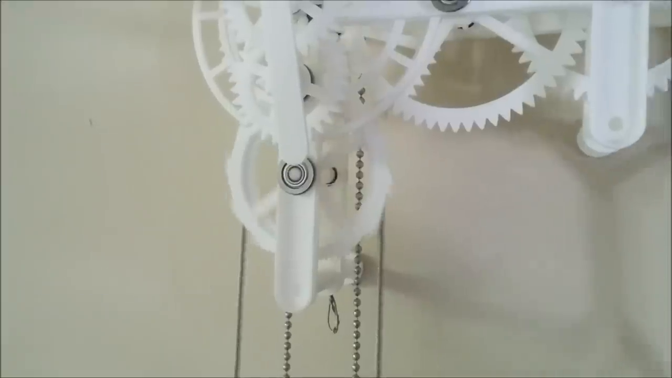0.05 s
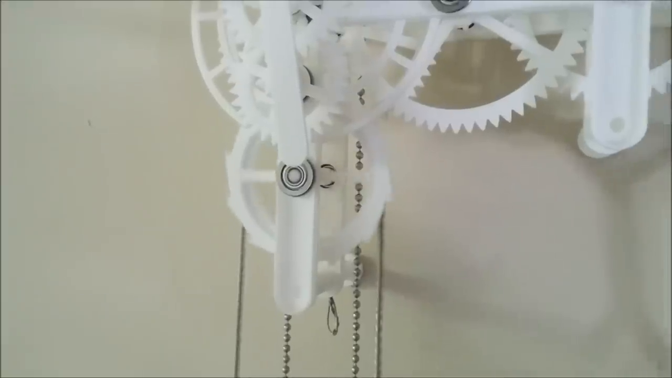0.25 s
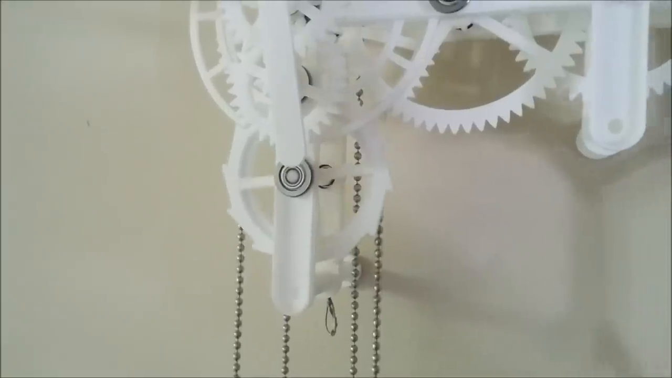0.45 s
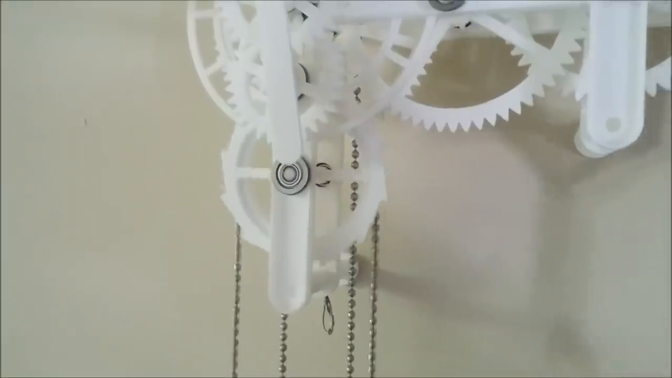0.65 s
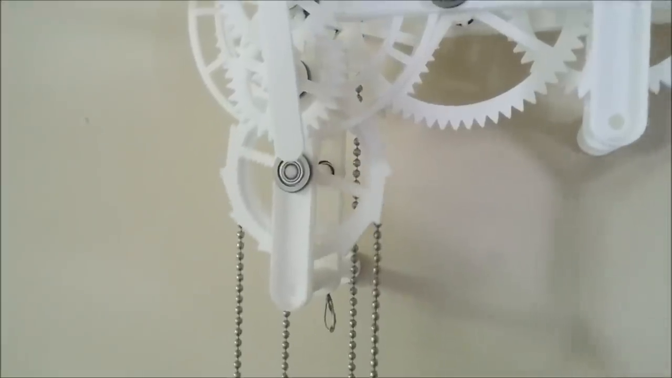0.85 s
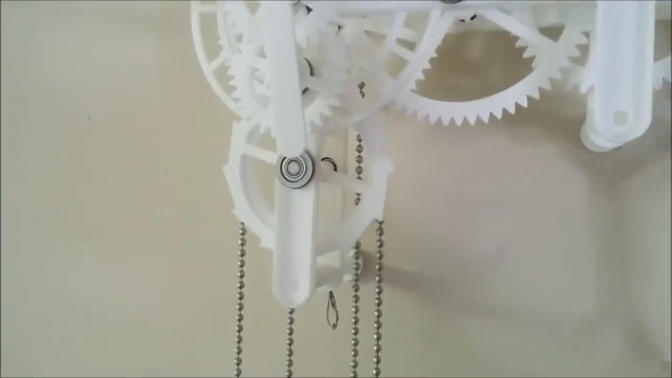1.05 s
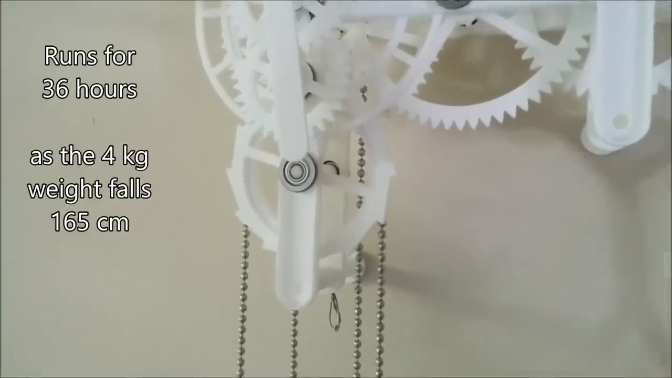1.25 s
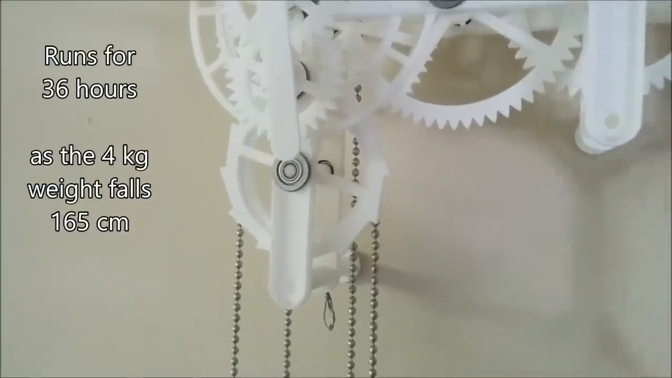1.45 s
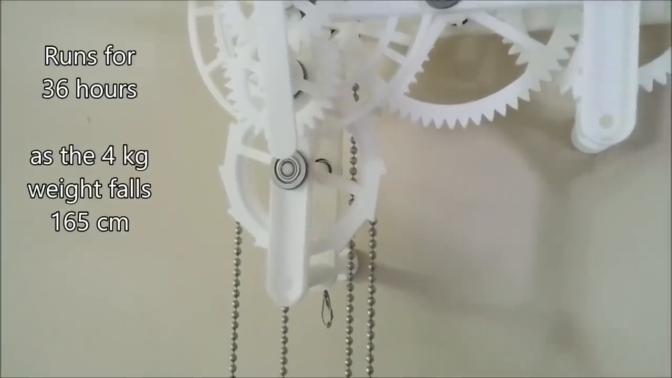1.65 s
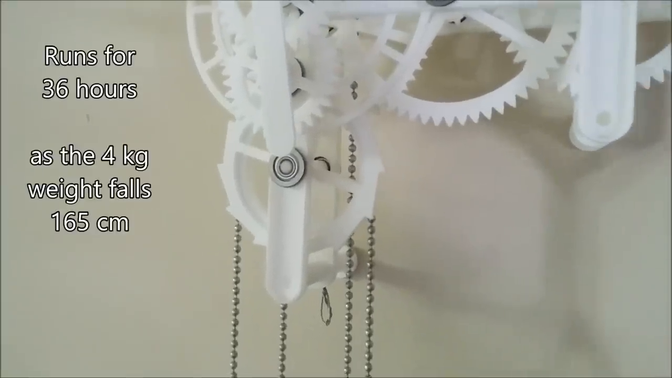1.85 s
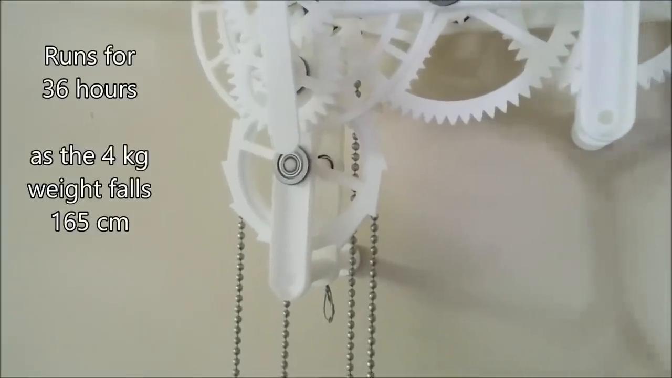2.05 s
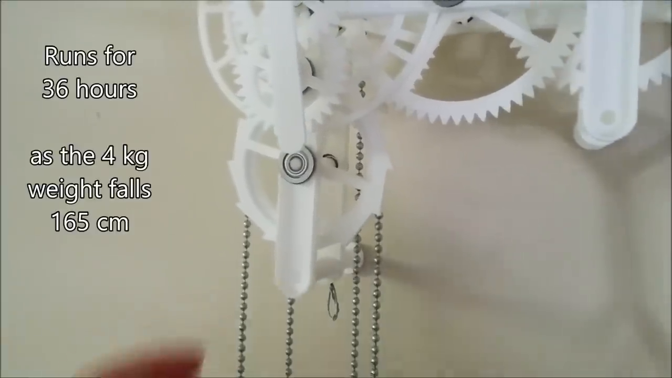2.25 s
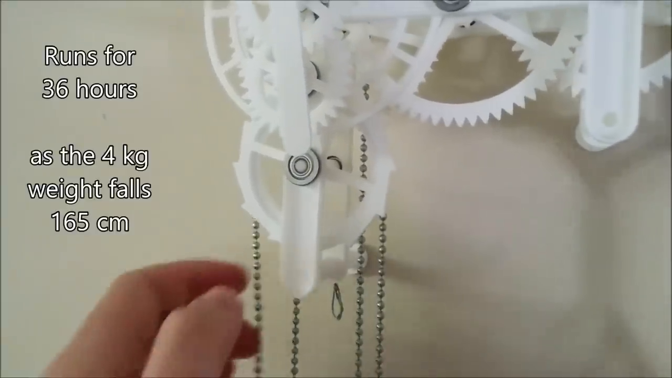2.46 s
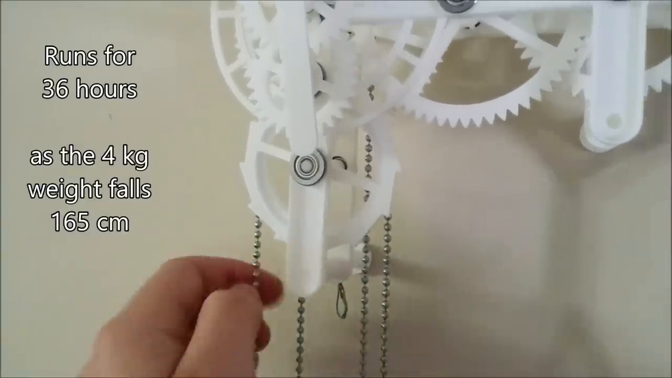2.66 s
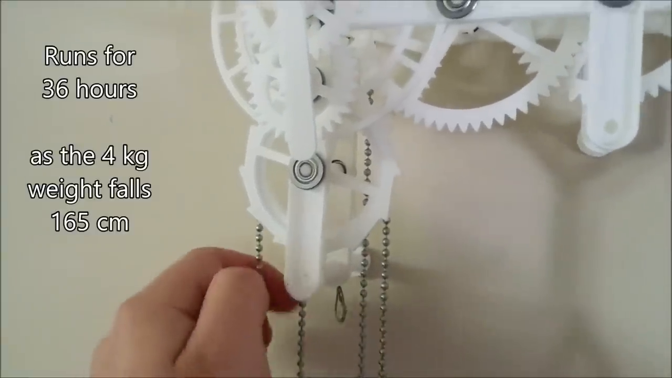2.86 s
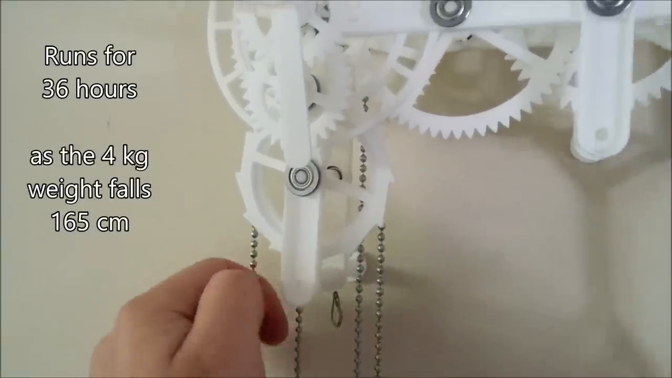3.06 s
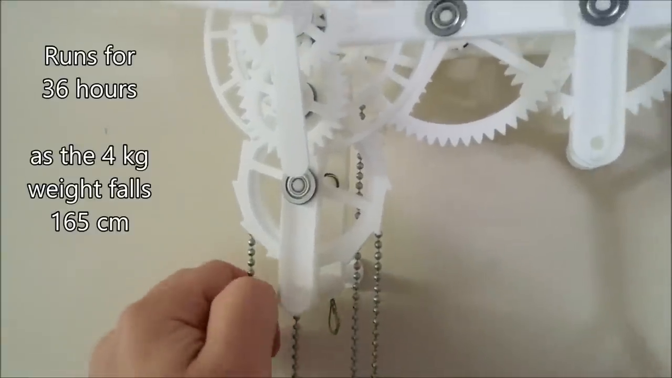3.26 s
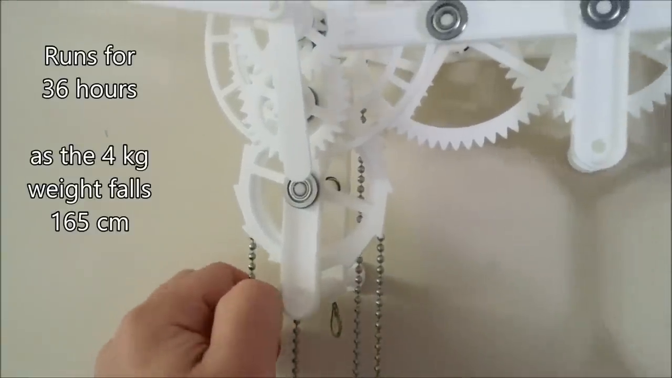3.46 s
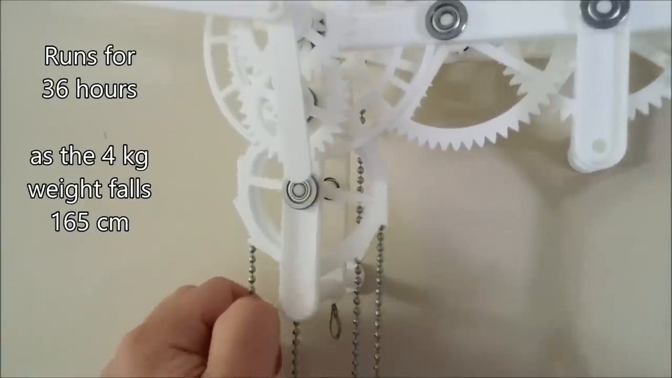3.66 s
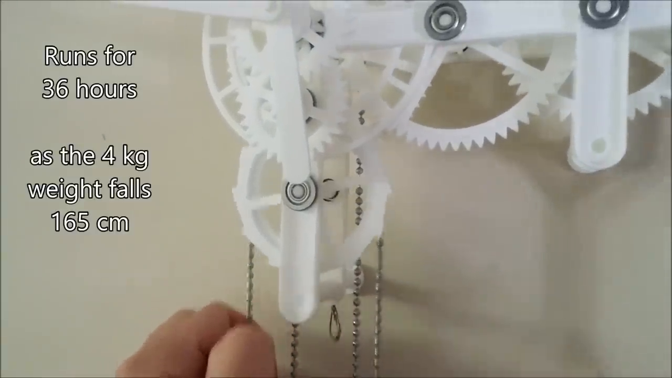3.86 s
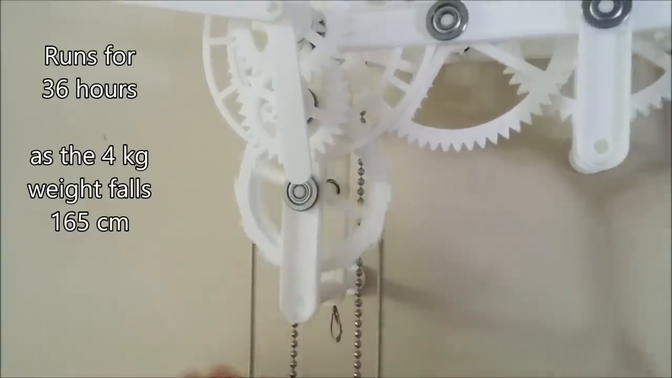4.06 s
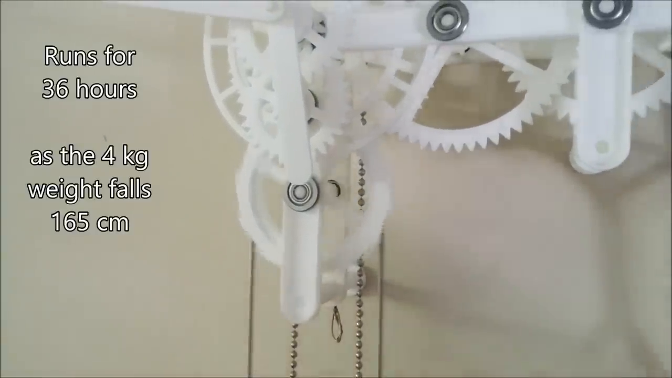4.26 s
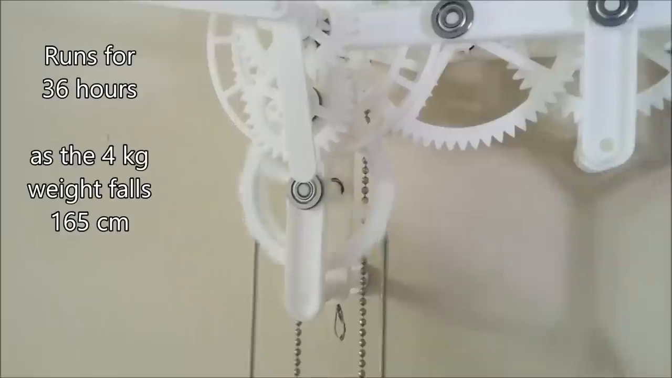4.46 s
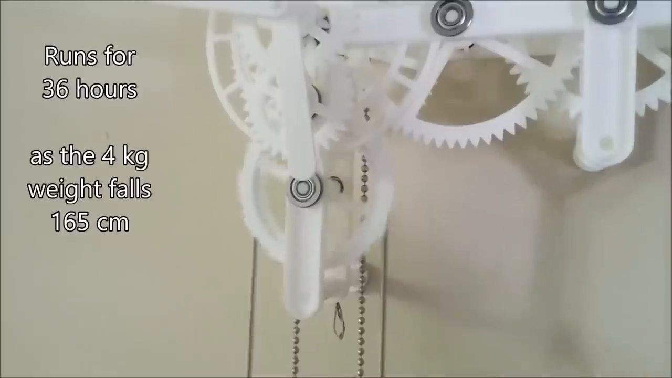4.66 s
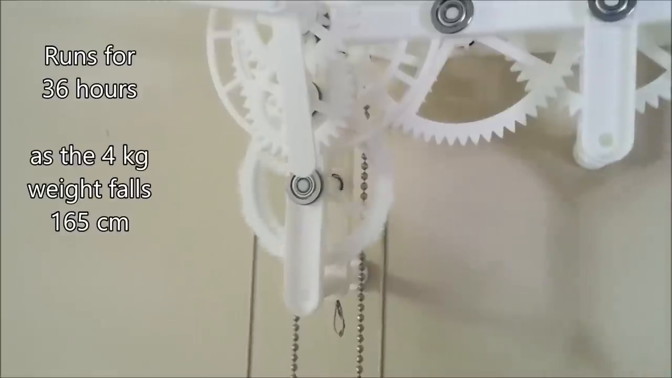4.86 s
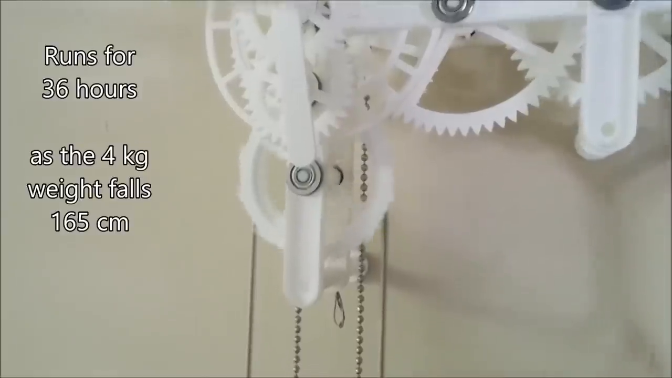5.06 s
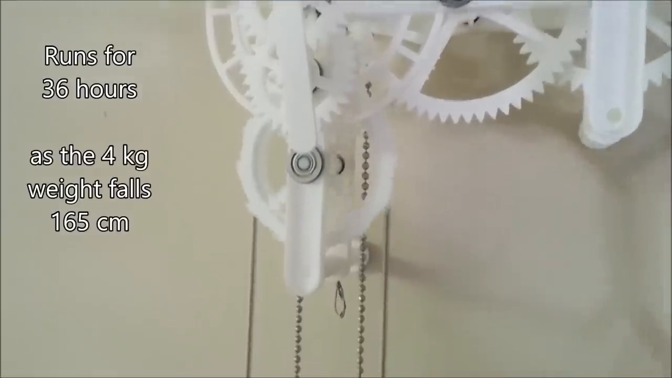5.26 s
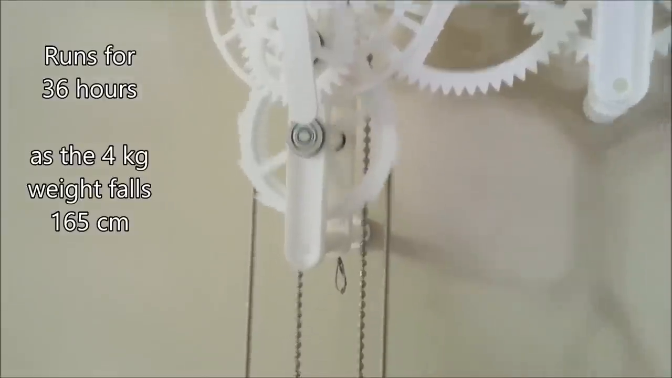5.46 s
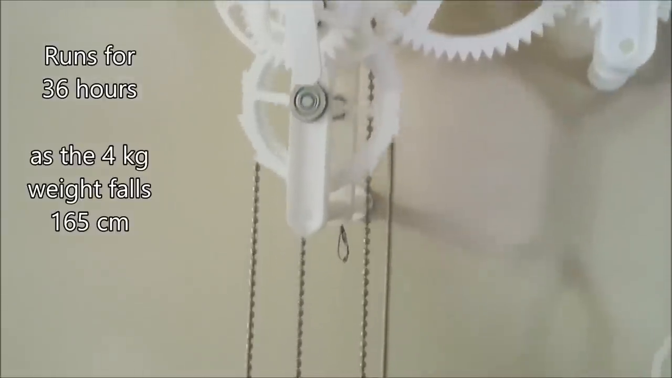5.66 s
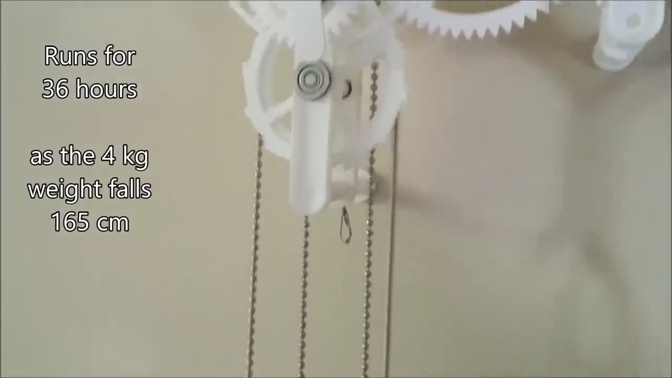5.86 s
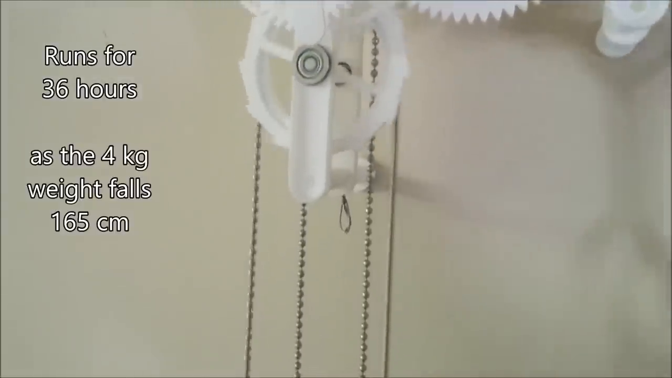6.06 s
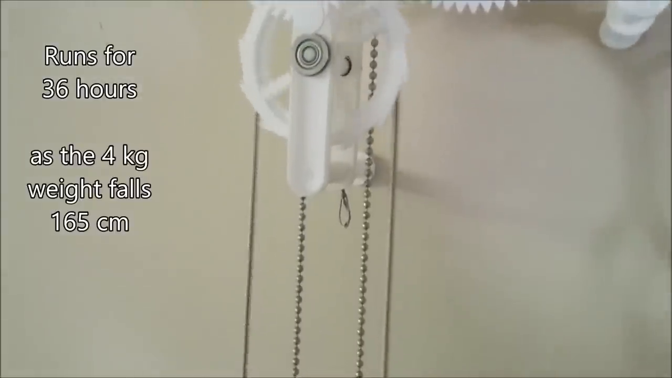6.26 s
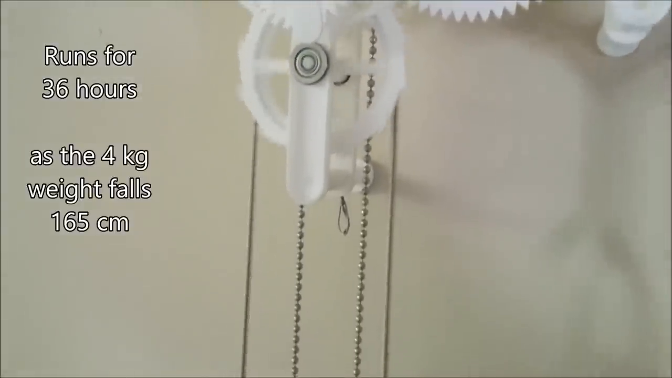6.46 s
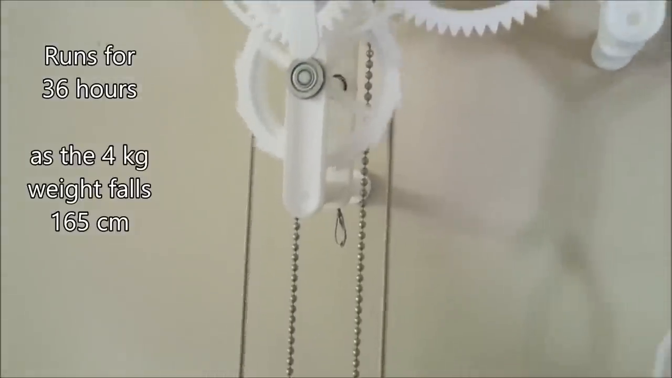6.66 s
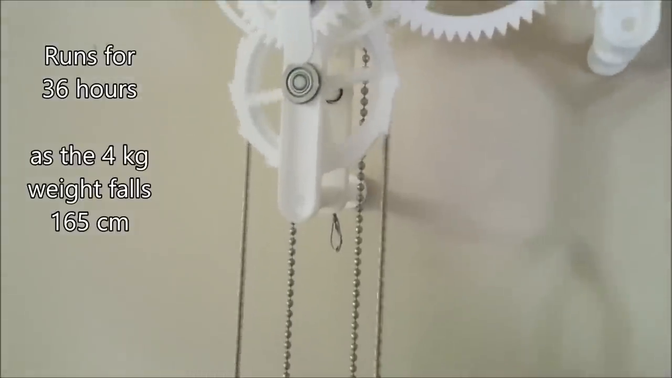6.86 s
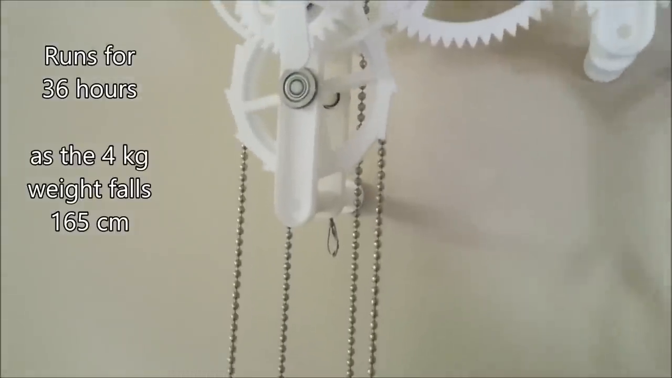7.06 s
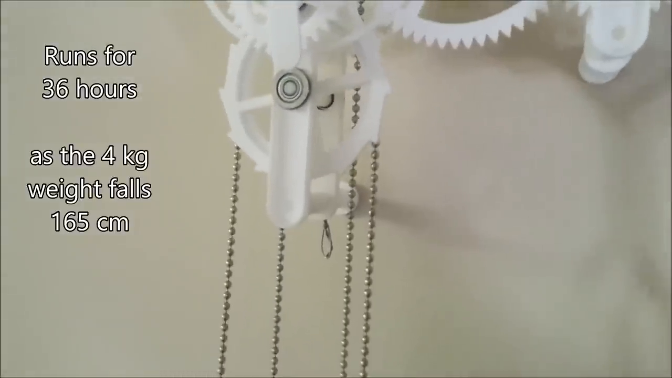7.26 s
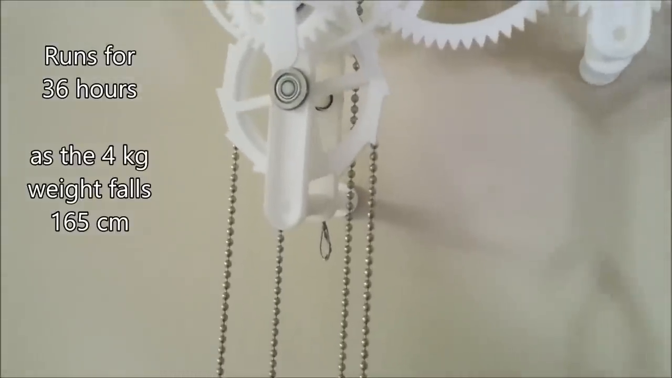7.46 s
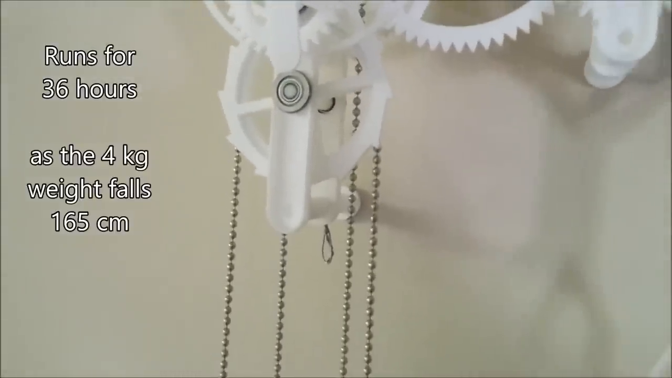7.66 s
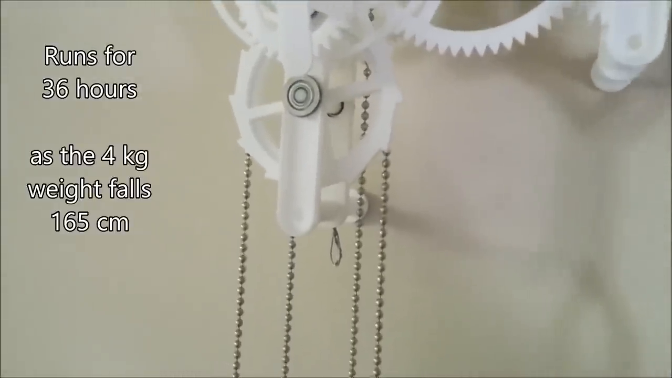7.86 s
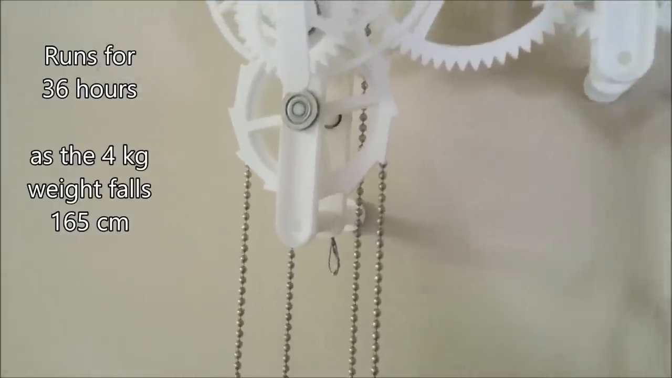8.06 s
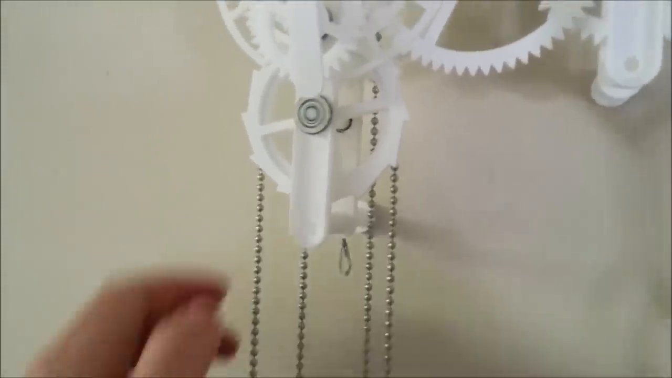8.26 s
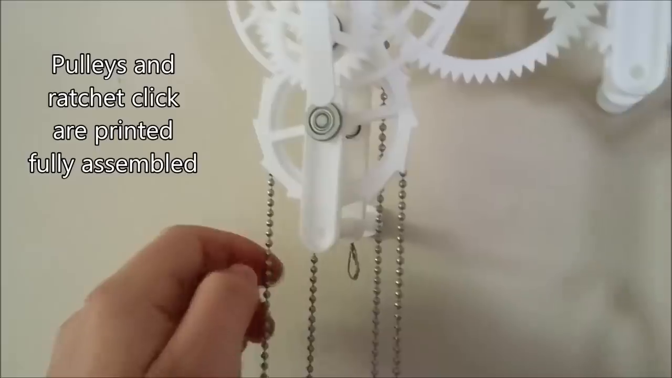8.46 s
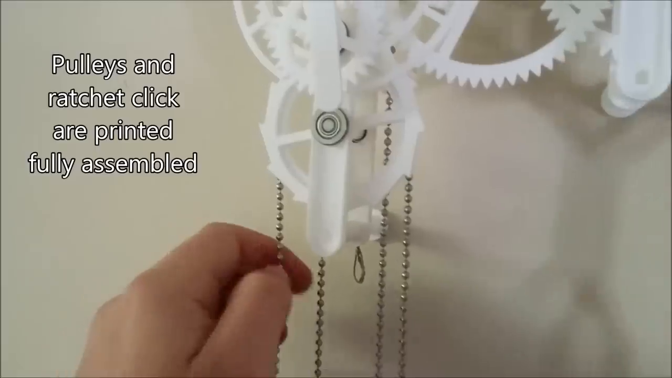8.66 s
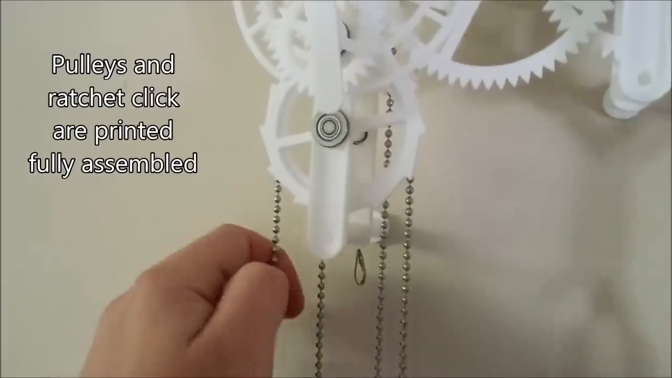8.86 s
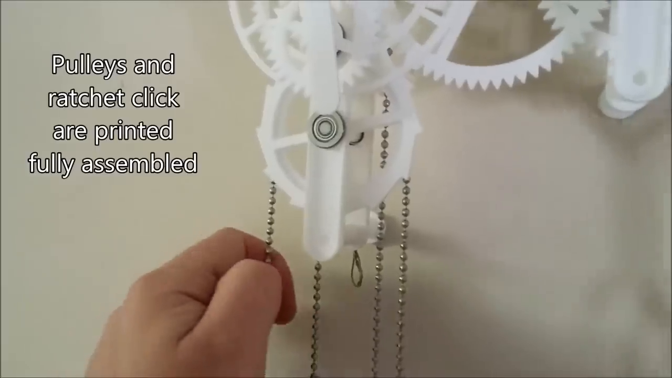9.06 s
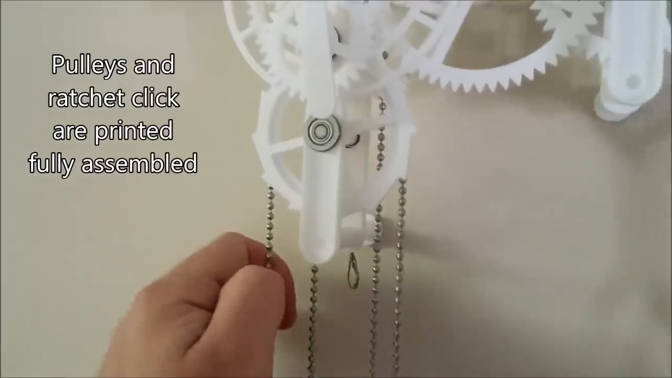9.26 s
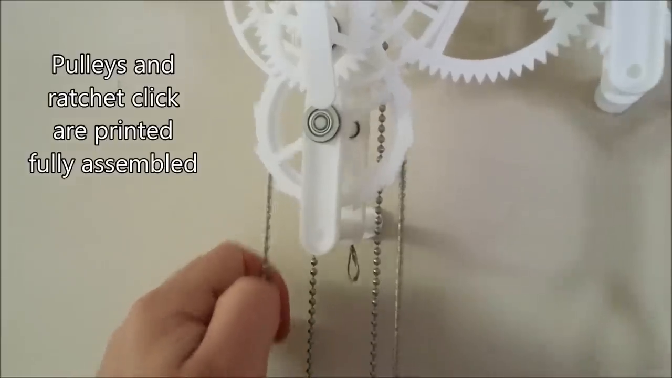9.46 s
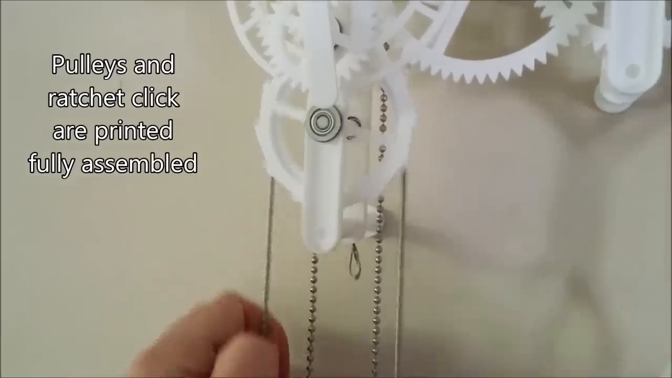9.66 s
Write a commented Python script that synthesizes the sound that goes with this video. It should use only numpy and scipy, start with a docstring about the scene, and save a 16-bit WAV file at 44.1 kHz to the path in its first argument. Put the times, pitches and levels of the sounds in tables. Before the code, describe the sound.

A plastic pendulum clock ticks twice a second while a ball chain is pulled through its pulley with fast ratchet clicks and fine rattling.

```python
"""A hand pulls the ball chain of a plastic pendulum clock in a small room: pawl clicks, chain rattle
and pulley rub follow the chain's speed over a rumbling frame and still air. The clock ticks twice a second
from 0.3 s; near 1 s the chain seats with a loud crack and the frame bumps. A longer pull runs from 4 to 7 s,
with more bumps, then the ticking goes on. Blows are noise bursts and decaying sines; the rest is shaped noise."""
import sys
import numpy as np
from scipy import signal
from scipy.fft import rfft, irfft, next_fast_len
from scipy.io import wavfile
from scipy.ndimage import uniform_filter1d

SR = 44100
rng = np.random.default_rng(int(sys.argv[2]) if len(sys.argv) > 2 else 0)


def to_wav(s):
    """Save 16-bit WAV."""
    ch = np.atleast_2d(s).T  # columns
    pcm = np.round(np.clip(ch, -1, 1) * 32767)  # PCM
    wavfile.write(sys.argv[1], SR, pcm.astype(np.int16))


N = 428204
RING_SIZE = 16384  # samples in one blow
AGE = np.arange(RING_SIZE) / SR  # s since the blow
REFERENCE_SPEED_HZ = 15  # teeth a second

# Ratchet clicks, one per tooth. Each row: start in seconds, relative level in dB, brightness in dB.
RATCHET = [(0.018, -37.5, 1.5), (0.099, -35.5, 12), (0.183, -56, -1), (0.272, -37, -0.5), (0.368, -41.5, 1),
           (4.069, -42.5, 2.5), (4.195, -40, 0.5), (4.282, -35.5, -12), (4.356, -38.5, -23),
           (4.421, -33.5, -6), (4.489, -35.5, -12.5), (4.545, -37, -1), (4.619, -38, -18), (4.677, -29, 9),
           (4.743, -37, 1), (4.81, -36, 2), (4.885, -36.5, -8.5), (4.95, -36, 3.5), (5.024, -35.5, -16),
           (5.09, -32.5, 9), (5.166, -31.5, 11.5), (5.24, -33.5, -4.5), (5.317, -32.5, 6),
           (5.395, -42.5, -10.5), (5.47, -36, -6), (5.548, -40, -10), (5.623, -48, -9), (5.717, -51, 5.5),
           (5.833, -44.5, -4), (5.971, -53, 1.5), (6.144, -55.5, -10), (6.294, -38.5, 2), (6.407, -43.5, 0),
           (6.522, -38, 8), (6.621, -42, 1), (6.725, -41.5, 5), (6.821, -41.5, -3), (6.922, -38, -1.5),
           (7.047, -40.5, 3.5)]
# Crowded, short-lived modes of pawl and pulley. Each row: frequency in Hz, level in dB.
PAWL = [(300, -46), (700, -18.5), (1500, -11), (2500, -1), (2900, -16.5), (3400, -7), (3900, 9),
        (4800, -10.5), (5800, -7), (6700, -11), (8000, -13), (9500, -25.5), (15000, -42)]
# Distinct modes of pawl and pulley. Each row: frequency in Hz, level in dB.
PAWL_MODES = [(665, -16), (1060, -16), (1250, -13.5), (1585, -4), (1730, -7), (2195, -8.5), (2330, -16),
              (2460, -10.5), (2640, -2.5), (3890, -11.5), (4060, -12.5), (4350, 1.5), (5700, 3), (5980, 5),
              (7700, -7)]
# Dull bumps of the loaded frame. Each row: start in seconds, frequency in Hz, relative level in dB,
# t60 of the swing in seconds.
BUMPS = [(.946, 209.4, -42, 0.15), (4.037, 90, -49.5, .12), (4.751, 138, -43.5, 0.27),
         (5.194, 118.3, -45.5, 0.083), (5.201, 248, -58, 0.13), (5.804, 72.6, -46.5, .08)]


def amp(db):
    """Decibels to gain."""
    return 10 ** (np.asarray(db) / 20)


def fade(t, t60):
    """Exponential decay, 60 dB down after t60."""
    return np.exp(-np.log(1000) * t / t60)


def unit(x):
    """Scale to an energy of one."""
    return x / np.sqrt(np.sum(x ** 2))


def colour(x, points):
    """Causal minimum-phase filter through (Hz, dB) points, built from the cepstrum."""
    size = 2 * next_fast_len(len(x) // 2 + 1)
    hz, db = np.transpose(points)
    freq = np.maximum(np.fft.rfftfreq(size, 1 / SR), 1)
    gain = amp(np.interp(np.log(freq), np.log(hz), db))
    cepstrum = irfft(np.log(gain))
    # fold the anticausal half onto the causal one
    cepstrum[1:size // 2] *= 2
    cepstrum[size // 2 + 1:] = 0
    response = np.exp(rfft(cepstrum))
    return irfft(rfft(x, size) * response)[:len(x)]


def noise(points):
    """Steady coloured noise of rms one."""
    return unit(colour(rng.standard_normal(N), points)) * np.sqrt(N)


def wander(rate_hz):
    """Random levels held 1 / rate_hz s and smoothed; spread a little under one."""
    hold = int(SR / rate_hz)
    levels = np.repeat(rng.standard_normal(N // hold + 1), hold)
    return uniform_filter1d(levels, hold)[:N]


def add(track, s, x):
    """Mix a sound in at time s."""
    start = max(int(s * SR), 0)
    track[start:start + len(x)] += x[:max(N - start, 0)]


def swells(rows):
    """A gain that rises and falls smoothly once per row of (middle s, length s, level dB)."""
    gain = np.zeros(N)
    for s, length_s, db in rows:
        add(gain, s - length_s / 2, amp(db) * np.hanning(int(length_s * SR)))
    return gain


def burst(grain, points, t60):
    """Many crowded modes dying together."""
    return unit(colour(grain * fade(AGE, t60), points))


def like(grain, change):
    """The same part struck at a slightly different spot."""
    return grain + change * rng.standard_normal(RING_SIZE)


def ring(modes, t60, scatter_db, detune):
    """Distinct modes, t60 given at 1 kHz and shorter above; each blow shares its force differently."""
    hz, db = np.transpose(modes)[:, :, None]
    force, shift, side = rng.standard_normal((3, len(modes), 1))
    decay = fade(AGE, t60 * (1000 / hz) ** .25)
    waves = np.sin(2 * np.pi * hz * (1 + detune * shift) * AGE) * decay
    gain = np.sign(side) * amp(db + scatter_db * np.clip(force, -1.5, 1.5))
    return unit(np.sum(gain * waves, axis=0))


def contact(points, hold_s, t60):
    """Two hard faces chatter for a moment as they meet, then fall silent."""
    swell_in = 1 - fade(AGE, 0.0035)
    envelope = fade(np.maximum(AGE - hold_s, 0), t60) * swell_in
    return unit(colour(rng.standard_normal(RING_SIZE) * envelope, points))


def spot(spread_db, count=24):
    """Where a blow lands favours some resonances and starves others: (Hz, dB)."""
    hz = np.geomspace(500, 12000, count)
    ripple = np.pad(np.clip(rng.standard_normal(count - 2), -2, 2), 1)
    return np.column_stack([hz, spread_db * ripple])


def blow(x, db):
    """Give a blow the energy of 10 ms at this level."""
    return unit(x) * amp(db) * np.sqrt(SR / 100)


def chain_speed(hand_inertia_s=0.067):
    """Teeth a second, sample by sample: one tooth passes between two clicks, and the hand cannot jerk."""
    clicks_s = np.array(RATCHET)[:, 0]
    rates_hz = 1 / np.diff(clicks_s)
    tooth = np.searchsorted(clicks_s, np.arange(N) / SR)
    steps_hz = np.r_[rates_hz[0], rates_hz, 0][tooth]
    return uniform_filter1d(steps_hz, int(hand_inertia_s * SR))


def ratchet(speed_hz, count=2, rebound_db=-13, rebound_s=0.0091):
    """The pawl snaps off a tooth, rings its pulley and chatters on; the landing spot sets the brightness."""
    # Colour of the snap. Each row: frequency in Hz, level in dB.
    snap_colour = [(1500, -27), (3500, -9.5), (4800, 1.5), (5900, 9), (7000, -7), (8500, -17), (11000, -34),
                   (16000, -50)]
    body_share = 0.29  # share of the brightness taken from the body
    spread_db_per_hz = 0.54  # a faster chain gives more body and snap
    out = np.zeros(N)
    grain = rng.standard_normal(RING_SIZE)
    for s, db, bright_db in RATCHET:
        spread_db = spread_db_per_hz * (speed_hz[int(s * SR)] - REFERENCE_SPEED_HZ)
        body_db = 6.75 + spread_db - body_share * bright_db
        snap_db = -1.25 + spread_db + (1 - body_share) * bright_db
        pulley = burst(like(grain, change=1.0), PAWL, t60=0.034)
        pulley += amp(-8.0) * ring(PAWL_MODES, t60=0.12, scatter_db=0.5, detune=0.0067)
        click = amp(-3.0) * contact(snap_colour, hold_s=0.00068, t60=0.0034)
        click += pulley * (1 - fade(AGE, 0.011))  # the pulley builds up just after the snap
        click = colour(click, [(2400, body_db), (3500, 0.00023), (4500, 0), (5800, snap_db)])
        add(out, s, blow(colour(click, spot(spread_db=4.5)), db + 3.0))
        for hop, (delay, force) in enumerate(rng.random((count, 2))):
            s += rebound_s * (0.52 + delay)
            chatter = burst(rng.standard_normal(RING_SIZE), PAWL, t60=0.036)
            add(out, s, blow(chatter, db + rebound_db + 6 * force - 5 * hop))
    return out


def chain_rattle(speed_hz, rate_hz=260, spread_db=6, count=4):
    """Small steel balls knock on the pulley rims as the four strands of the chain run or stir."""
    # The hanging chain stirs against its pulley. Each row: middle in seconds, length in seconds, level in dB.
    stirs = [(2.08, 0.049, -77), (3.12, 0.041, -77), (7.17, 0.055, -71.5), (9.7, 0.13, -74)]
    rattle_db, rattle_db_per_hz = -54, 4.5  # at reference speed and above; slope below it
    slowness_hz = np.minimum(speed_hz - REFERENCE_SPEED_HZ, 0)
    gain = amp(rattle_db + rattle_db_per_hz * slowness_hz) + swells(stirs)
    rattle = np.zeros(N)
    for _ in range(count):
        chance, size = rng.random(N), rng.exponential(size=N)
        force = amp(spread_db * np.minimum(size, 3.5)) * rng.choice([-1, 1], N)
        knocks = (chance < rate_hz / SR) * force
        rim = burst(rng.standard_normal(RING_SIZE), PAWL, t60=0.0098)
        rim += amp(-4.0) * ring(PAWL_MODES, t60=0.028, scatter_db=5.0, detune=.006)
        rattle += signal.fftconvolve(knocks, rim)[:N]
    rattle = unit(colour(rattle, [(1500, 7), (6000, -6.5)])) * np.sqrt(N)
    return rattle * gain


def rubbing(speed_hz):
    """The pulleys rub unevenly, louder as the chain runs faster, and swell where one binds."""
    # Rub colour, resonant near 210 Hz. Each row: frequency in Hz, level in dB.
    rub_colour = [(60, -16), (170, -11.5), (210, -1), (250, -5), (330, -6.5), (450, -16.5), (880, -13),
                  (1300, -26), (3000, -29), (8000, -49)]
    # A pulley binds for a moment. Each row: middle in seconds, length in seconds, level in dB.
    scrapes = [(3.25, 1.43, -80), (6.604, 1.21, -67), (9.206, 0.19, -70.5), (9.656, .18, -67.5)]
    rub_db, rub_db_per_hz = -71, 0.8  # at reference speed; slope
    gain = amp(rub_db + rub_db_per_hz * (speed_hz - REFERENCE_SPEED_HZ)) + swells(scrapes)
    return noise(rub_colour) * gain * amp(2.7 * wander(5.6))


def loaded_frame():
    """The frame rumbles, and the load shifts with dull bumps: a damped swing plus a noisy thud."""
    # Rumble colour. Each row: frequency in Hz, level in dB.
    rumble_colour = [(20, -28), (40, -9), (62, 3.5), (100, -5), (150, -4), (300, -19.5), (1500, -50)]
    # Rumble contour. Each row: time in seconds, relative level in dB.
    rumble_level = [(0.0, -86), (1.32, -76), (2.46, -78), (3.02, -72), (5.59, -72.5), (5.78, -70),
                    (7.81, -75.5), (9.7, -74)]
    rumble_db = np.interp(np.arange(N) / SR, *np.transpose(rumble_level))
    out = noise(rumble_colour) * amp(rumble_db + 0.5 + 2.7 * wander(9.9))
    for s, hz, db, t60 in BUMPS:
        push = 1 - fade(AGE, 0.01)  # a soft contact swells in
        thud_colour = [(hz / 3, -15), (hz, 0), (2 * hz, -5), (5 * hz, -35), (20 * hz, -75)]
        thud = burst(rng.standard_normal(RING_SIZE), thud_colour, t60=0.18)
        swing = fade(AGE, t60) * np.sin(2 * np.pi * hz * AGE)
        add(out, s, amp(db + 4.5) * push * (swing + 7 * thud))
    return out


def still_air():
    """Steady faint noise of the still air."""
    # Air colour. Each row: frequency in Hz, level in dB.
    air_colour = [(26, -33.5), (45, -2.5), (251, -10), (291, -6), (453, -9.5), (880, -12.5), (4920, -22.5),
                  (8870, -22), (14900, -25), (16000, -30.5)]
    return amp(-75) * noise(air_colour)


def escapement(count=5, restitution=0.62, loss_db=-6):
    """A tooth drops on a pallet and bounces, each hop shorter and weaker; the frame knocks along."""
    # Beats, tick and tock in turn. Each row: start in seconds, relative pallet ring level in dB,
    # relative frame knock level in dB.
    beats = [(0.266, -44.5, -45.5), (0.755, -36.5, -38.5), (1.262, -39.5, -44), (1.759, -39.5, -37.5),
             (2.259, -38.5, -44.5), (2.759, -40.5, -51.5), (3.263, -41, -46), (3.755, -50, -50),
             (4.267, -38, -41), (4.751, -43, -38.5), (5.269, -42, -44.5), (5.754, -39.5, -45.5),
             (6.267, -38.5, -53), (6.753, -36.5, -42.5), (7.258, -40.5, -43.5), (7.751, -38.5, -37.5),
             (8.255, -35, -42), (8.752, -38, -41.5), (9.258, -36, -41.5)]
    # Tick pallet bounces wide and hard, tock pallet settles fast. Each row: mean gap to the first bounce
    # in seconds, first bounce level in dB.
    pallets = [(.021, -1.5), (.013, -7.5)]
    # Crowded modes, then distinct modes, of wheel and pallets. Each row: frequency in Hz, level in dB.
    pallet_colour = [(3000, -44.5), (6300, -20), (7600, -1), (9000, 3.5), (10400, 0.5), (11800, -8),
                     (14000, -16.5), (16000, -28.5)]
    pallet_modes = [(7850, -12), (8870, 4), (9400, -8), (10100, -7), (10600, -12), (13300, -12.5)]
    # Crowded modes, then distinct modes, of the frame. Each row: frequency in Hz, level in dB.
    frame_colour = [(200, -28), (420, -21.5), (800, -11), (1100, -3.5), (1650, -2), (2100, -13),
                    (3300, -12), (5000, -5.5), (6500, -14.5), (10000, -24)]
    frame_modes = [(310, -22), (522, -9.5), (660, -14), (1065, -2.5), (1150, -12), (1460, -3.5),
                   (1680, -2.5), (2690, -8), (3250, -12), (4120, -9), (5150, -6.5)]
    out = np.zeros(N)
    pallet_grains, frame_grains = rng.standard_normal((2, 2, RING_SIZE))
    for beat, (s, ring_db, knock_db) in enumerate(beats):
        side = beat % 2  # tick and tock come from opposite pallets
        gap_s, bounce_db = pallets[side]
        gap_s *= 1 + .1 * rng.uniform(-1, 1)
        tooth = spot(spread_db=2.5)  # no two teeth are quite alike
        for hop in range(count):
            force_db = bounce_db + loss_db * (hop - 1) if hop else 0
            tick = contact(pallet_colour, hold_s=.0021, t60=.006)
            tick += amp(-8) * burst(like(pallet_grains[side], change=0.2), pallet_colour, t60=.05)
            tick += amp(-8.5) * ring(pallet_modes, t60=.09, scatter_db=3, detune=.004)
            knock = burst(like(frame_grains[side], change=.8), frame_colour, t60=.036)
            knock += amp(-5) * ring(frame_modes, t60=0.07, scatter_db=3, detune=.007)
            knock *= 1 - fade(AGE, 0.016)  # the heavy frame takes longer to get moving
            add(out, s - .0004, blow(colour(tick, tooth), ring_db + force_db + .5))
            add(out, s + .0004, blow(colour(knock, tooth), knock_db + force_db + 4 - 1.2 * hop))
            s += gap_s * restitution ** hop
    return out


def chain_seating():
    """The chain drops into its sockets with a crack and shivers under the weight."""
    # The chain seats in its pulley. Each row: start in seconds, relative level in dB.
    seatings = [(0.921, -31)]
    # Crowded modes, then distinct modes, of taut chain and pulley. Each row: frequency in Hz, level in dB.
    chain_colour = [(300, -27), (900, -19.5), (1600, -3.5), (3000, -14), (4300, 2.5), (5200, -8),
                    (7000, -17.5), (8500, -20.5), (10500, -40), (16000, -48.5)]
    seat_modes = [(660, -11), (1577, -6.5), (1717, -9), (2024, -10), (2466, -2.5), (2697, -8.5), (3892, 1),
                  (4350, 2.5), (4600, -3.5), (4920, -4.5), (5010, -7), (5238, -9)]
    out = np.zeros(N)
    for s, db in seatings:
        crack = contact(chain_colour, hold_s=.005, t60=0.072)
        # the taut chain slaps the pulley once per swing of the frame
        slaps = 1 + 0.3 * np.cos(2 * np.pi * BUMPS[0][1] * AGE)
        shiver = burst(rng.standard_normal(RING_SIZE) * slaps, chain_colour, t60=0.22)
        chime = ring(seat_modes, t60=0.21, scatter_db=1.5, detune=0.0021)
        add(out, s, blow(crack + amp(-9.5) * shiver + amp(-10.5) * chime, db + 6.0))
    return out


def room(x, t60=0.33, wet_db=-17, wall_s=.0098, wall_db=-14):
    """One early reflection from a near wall, and a faint diffuse tail."""
    # Echo colour. Each row: frequency in Hz, level in dB.
    echo_colour = [(200, 10.5), (1300, -1), (2800, -1), (5000, -7.5), (8000, 6), (11000, 2), (16000, 5)]
    build_up = 1 - fade(AGE, 0.036)
    response = amp(wet_db) * burst(rng.standard_normal(RING_SIZE) * build_up, echo_colour, t60)
    response[int(wall_s * SR)] += amp(wall_db)
    return x + signal.fftconvolve(x, response)[:N]


def scene():
    """The clock and its winding in the room, over still air."""
    speed_hz = chain_speed()
    clock = ratchet(speed_hz) + chain_rattle(speed_hz) + rubbing(speed_hz)
    clock += loaded_frame() + escapement() + chain_seating()
    return (room(clock) + still_air())[None]


def record(dry, top_hz=16200):
    """The recorder cuts the top with a steep elliptic low-pass."""
    low_pass = signal.ellip(8, .2, 70, top_hz, fs=SR, output="sos")
    return signal.sosfilt(low_pass, dry)


dry = scene()
out = record(dry)
to_wav(out)
```